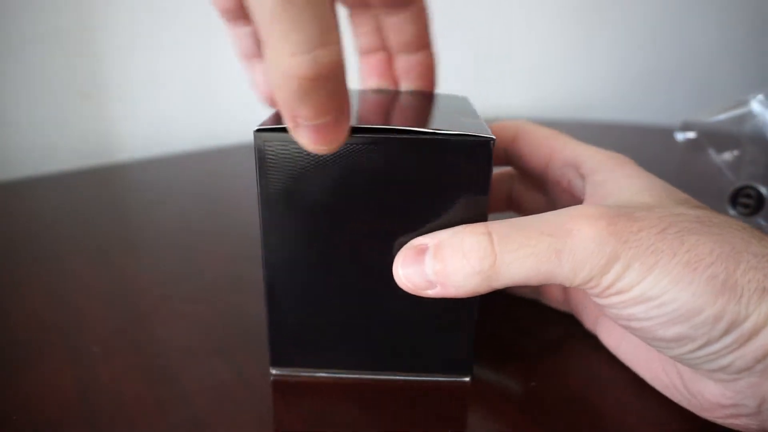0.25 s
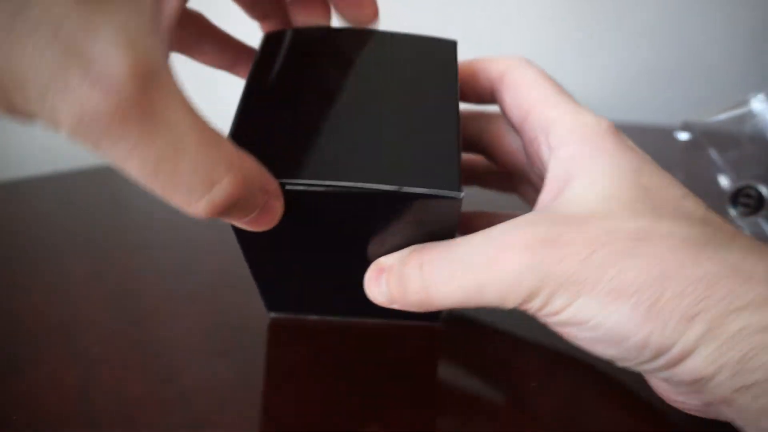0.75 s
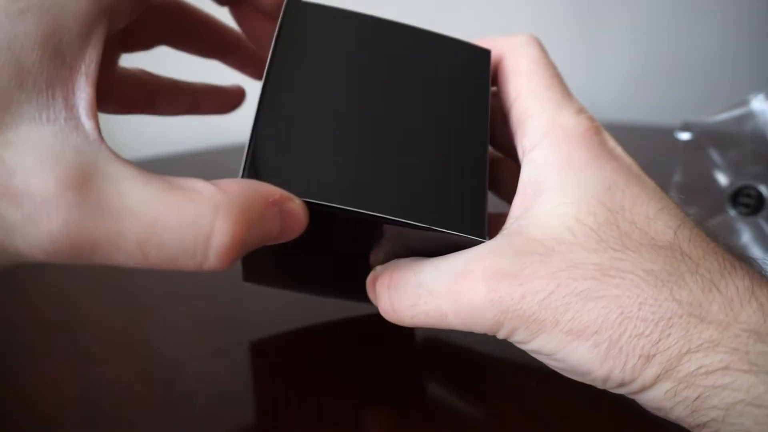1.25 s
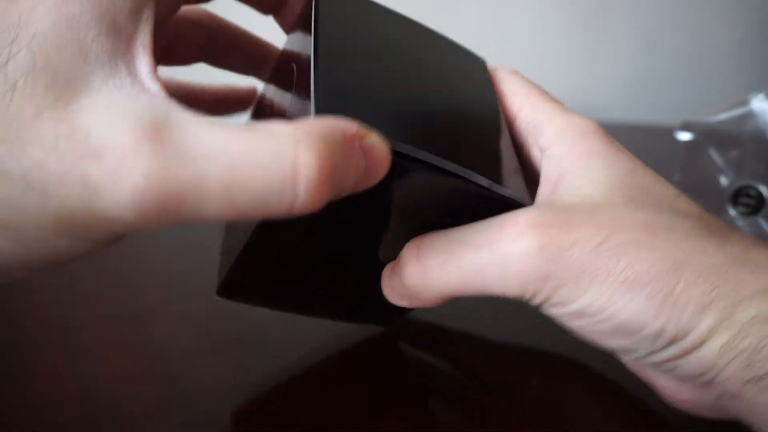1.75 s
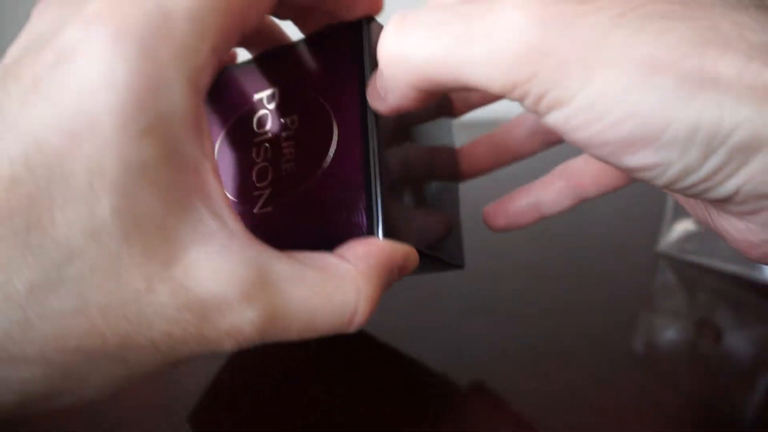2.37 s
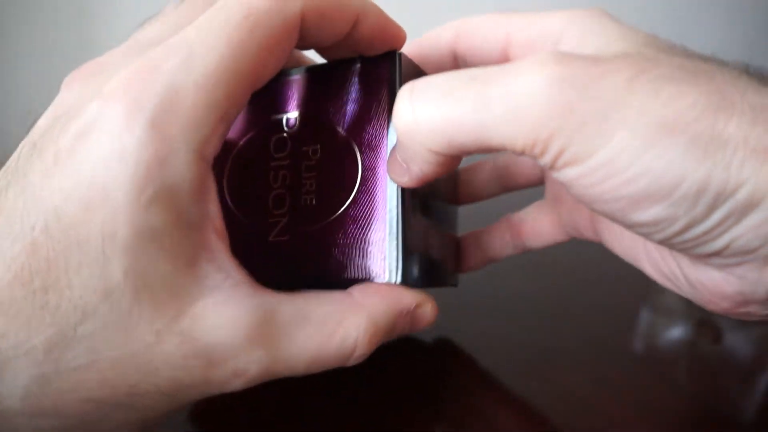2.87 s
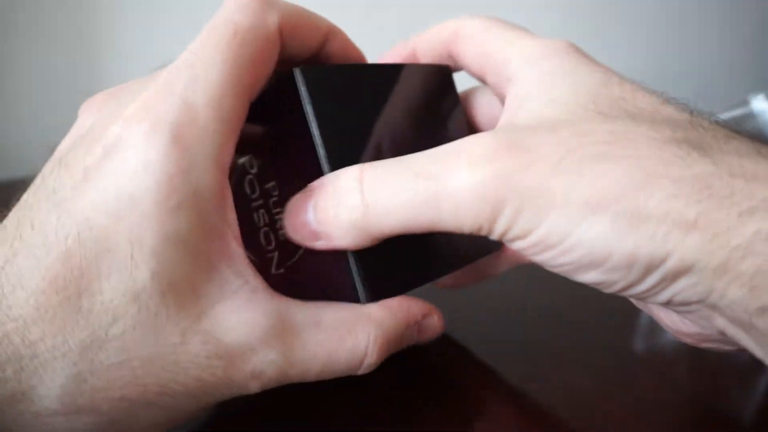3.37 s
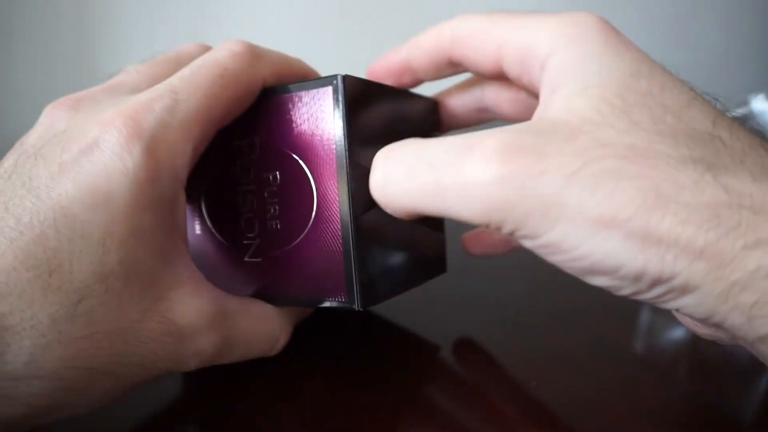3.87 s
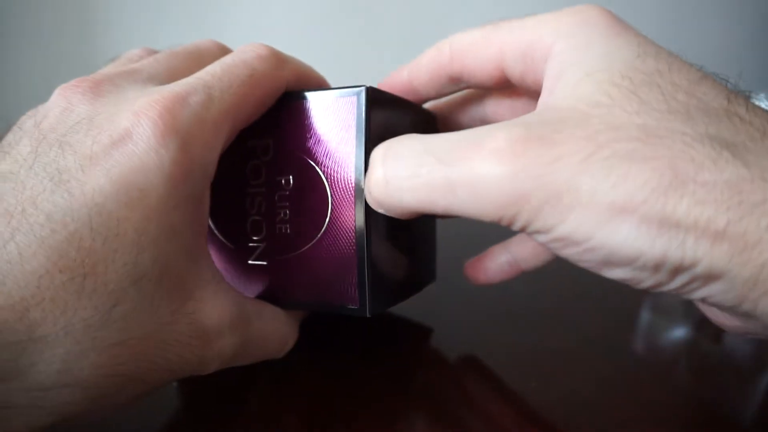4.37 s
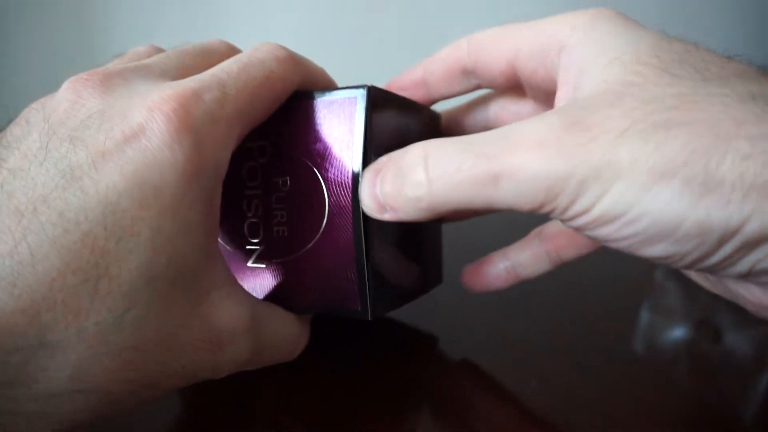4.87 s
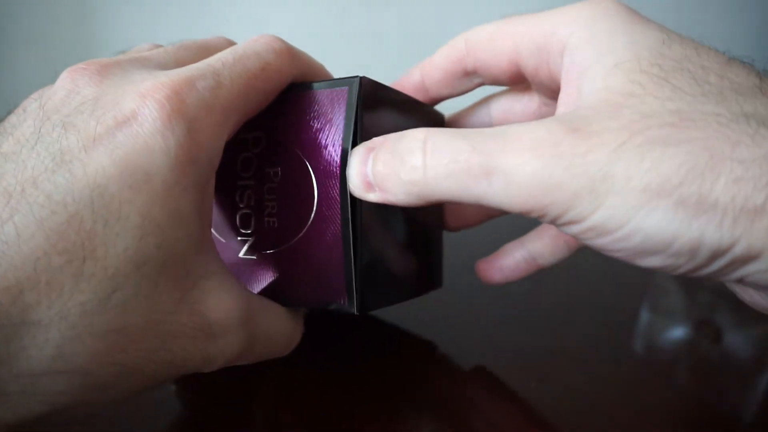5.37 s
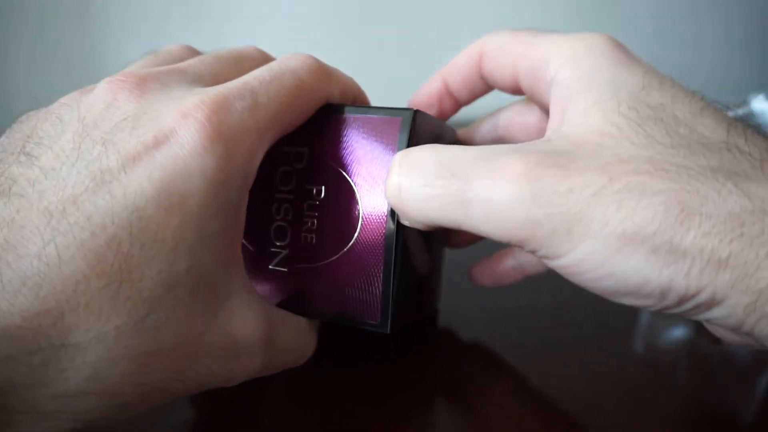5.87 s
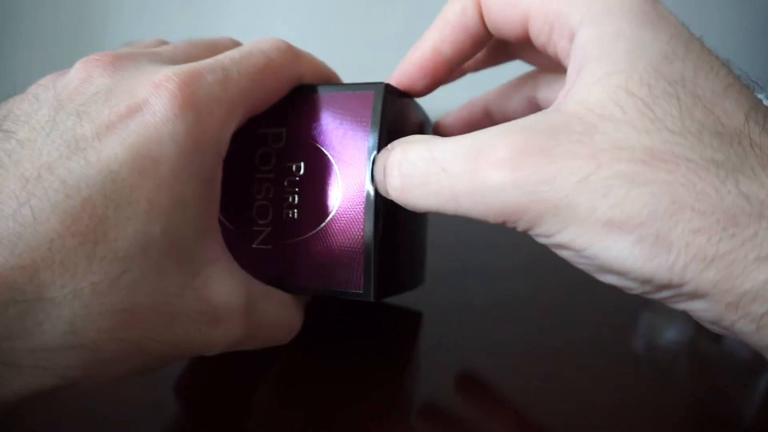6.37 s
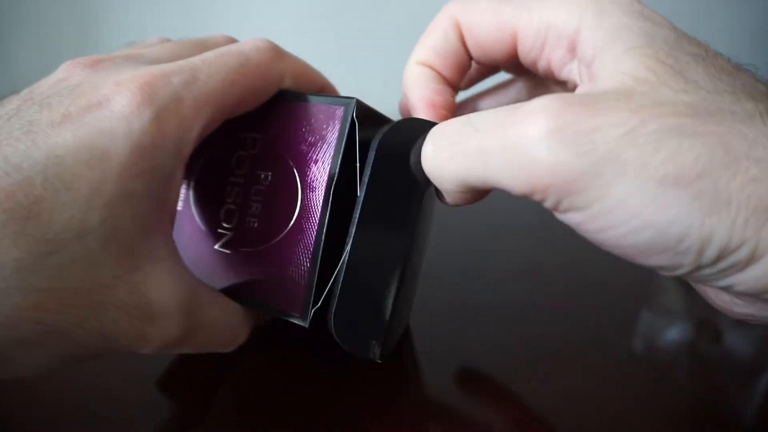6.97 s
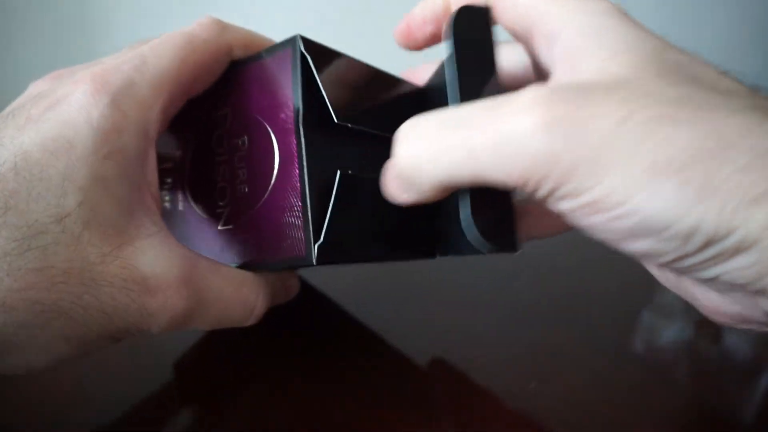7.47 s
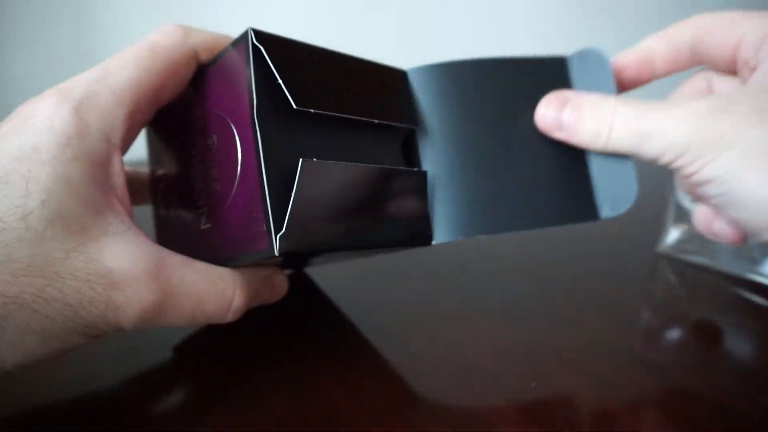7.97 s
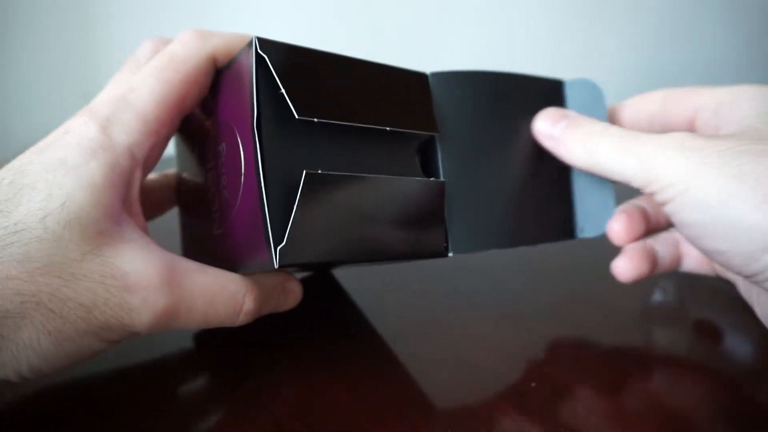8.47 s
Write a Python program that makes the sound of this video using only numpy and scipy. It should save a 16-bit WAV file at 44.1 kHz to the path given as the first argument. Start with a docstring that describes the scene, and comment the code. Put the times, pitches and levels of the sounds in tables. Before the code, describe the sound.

A small stiff carton is handled very near the microphone, dry but with short room reflections and soft background air. Light hollow taps and brief rubs come first, then a sharp knock against the table as the grip changes. A long stretch of gentle, sparse finger taps follows. Then come raspy scrapes, clicking edges, a tiny creak and a hinge pop as the lid opens, ending with bright card snaps and rubbing.

```python
"""A small, quiet room, just above a table top: hands turn a stiff cardboard box close to a camera's stereo microphone.
Fingertips pat and rub the hollow box, nails tick on its coating, card edges scrape and snap, and the lid is pulled open.
Pushes and runs of tiny slips ring damped modes of box and flaps; filtered slips and noise make the coating crackle.
Table and wall echoes, a diffuse tail, a brief low rumble and steady room noise surround the hands."""
import sys
import numpy as np
from scipy import signal
from scipy.fft import rfft, irfft, next_fast_len
from scipy.io import wavfile
from scipy.ndimage import uniform_filter1d, map_coordinates

SR = 44100
rng = np.random.default_rng(int(sys.argv[2]) if len(sys.argv) > 2 else 0)


def unload_wav(signal):
    """Save mono or channel-first audio to the path in sys.argv[1] as 16-bit WAV at rate SR, clipped to [-1, 1]."""
    wavfile.write(
        sys.argv[1],
        SR,
        np.round(np.clip(np.atleast_2d(signal).T, -1, 1) * 32767).astype(np.int16),
    )


N = 384552
TIME = np.arange(N) / SR


def undb(db):
    """Decibels to amplitude gain."""
    return 10 ** (np.asarray(db) / 20)


def unit(x):
    """Scale to rms 1."""
    return x / np.sqrt(np.mean(x ** 2) + 1e-20)


def at_peak(x, db):
    """Set the level of the loudest 4 ms."""
    power = uniform_filter1d(np.mean(x, axis=0) ** 2, SR // 250)
    return x * undb(db) / np.sqrt(power.max() + 1e-20)


def add(out, x, s):
    """Mix a stereo sound in at time s."""
    i = max(int(s * SR), 0)
    part = x[:, :max(N - i, 0)]
    out[:, i:i + part.shape[1]] += part


def colour(x, points):
    """Filter by a curve of (f/Hz, level/dB), interpolated over log frequency."""
    hz, db = np.transpose(points)
    size = next_fast_len(x.shape[-1])
    f = np.maximum(np.fft.rfftfreq(size, 1 / SR), 1)
    gain = undb(np.interp(np.log(f), np.log(hz), db))
    return irfft(rfft(x, size) * gain, size)[..., :x.shape[-1]]


# room noise, shape of its spectrum: [f/Hz, relative level/dB]
ROOM_NOISE = [(20, -42), (60, -32), (110, -14), (200, -11), (400, -5), (700, -4.5), (1200, -8),
              (2500, -13.5), (6000, -16.5), (11000, -14.5), (16000, -19)]
ROOM_NOISE_DB = -62  # rms of the part common to both sides


def air():
    """Steady noise of the room, narrower in the bass than in the treble."""
    mid, side = colour(rng.standard_normal((2, N)), ROOM_NOISE)
    side = colour(side, [(100, -8.0), (600, 2.5), (1500, 2.0), (8000, 1.0)])
    return undb(ROOM_NOISE_DB) * (mid + np.outer([1, -1], side)) / np.std(mid)


def rumble(centre_s=2.075, width_s=0.097, db=-53):
    """A brief low rumble as the box is swung round: filtered noise under a bell-shaped swell."""
    noise = colour(rng.standard_normal(N), [(20, -18), (60, -1), (150, 3.5), (240, -4.5), (500, -15), (3000, -70)])
    swell = np.exp(-((TIME - centre_s) / width_s) ** 2)
    return undb(db) * unit(noise) * swell


# reverberation of the small room: [f/Hz, relative level/dB, t60/s]
ROOM_TAIL = [(150, -2, 0.57), (400, -3.5, 0.29), (900, -0.5, 0.29), (1800, 0, 0.27), (5330, -3.5, 0.26),
             (9400, -5, 0.24), (14800, -8, 0.16)]


def room(dry, wet_db=-3, build_s=0.00076, table_db=-11, table_s=.0029, wall_db=-16, wall_s=0.014):
    """Echoes from the table top and the near wall, and a diffuse tail whose bass is alike on both sides."""
    t = np.arange(SR * 2 // 3) / SR
    hz, db, t60 = np.transpose(ROOM_TAIL)
    f = np.maximum(np.fft.rfftfreq(len(t), 1 / SR), 1)
    mid, side = rfft(rng.standard_normal((2, len(t))))
    width = np.minimum(f / 1700, 1)
    noise = (mid + np.outer([1, -1], width * side)) / np.sqrt(1 + width ** 2)
    response = np.zeros((2, len(t)))
    # each row of the identity picks one band, which overlaps its neighbours
    for share, band_db, band_t60 in zip(np.eye(len(hz)), db, t60):
        decay = 1000 ** (-t / band_t60) * (1 - np.exp(-t / build_s))
        band = irfft(noise * np.interp(np.log(f), np.log(hz), share), len(t))
        response += undb(band_db + wet_db) * band * decay / np.linalg.norm(decay)
    response[:, 0] += 1  # direct sound
    # both echoes reach the two sides at slightly different moments
    response[[0, 1], [int(table_s * SR), int(table_s * SR) + 3]] += undb(table_db)
    response[[0, 1], [int(wall_s * SR), int(wall_s * 1.02 * SR)]] += undb(wall_db)
    return signal.fftconvolve(dry, response, axes=1)[:, :N]


def ring(force, modes, main_hz=None, main_db=7, main_sustain=1.32, detune=0.035, apart=.1,
         thud=0.38, thud_share=0.44, sustain=1):
    """Drive damped modes. The grip bends the panels: one mode may lead at main_hz, the others stray in pitch."""
    hz, db, t60 = np.transpose(modes)
    t = np.arange(SR // 16) / SR
    nearest = np.argmin(np.abs(hz - main_hz)) if main_hz else -1
    lead = np.arange(len(hz)) == nearest
    strayed_hz = hz * (1 + detune * rng.standard_normal(len(hz)))
    hz = np.where(lead, main_hz or 0, strayed_hz)
    t60 = t60 * np.where(lead, main_sustain, 1) * max(sustain, .1)
    decay = 1000 ** (-t / t60[:, None])
    # card loses its first, widest swings fastest, which broadens every resonance
    fast_decay = decay ** (1 / max(thud_share, .05))
    waves = np.sin(2 * np.pi * hz[:, None] * t) * (decay + thud * fast_decay)
    # the weaker modes beam unevenly to the two sides
    lean = rng.choice([-1, 1], len(hz)) * np.where(lead, .25, 1)
    sides = 1 + apart * np.outer([1, -1], lean)
    gains = undb(db + main_db * lead) * (-1) ** np.arange(len(hz)) * sides
    return signal.fftconvolve(force[None], gains @ waves, axes=1)[:, :len(force)]


def grains(size, rate, spread_db):
    """Tiny slips of uneven strength and random sign at random moments, rate per second."""
    chance = rng.random(size) < rate / SR
    strength = undb(spread_db * np.minimum(rng.exponential(size=size), 4))
    return chance * strength * rng.choice([-1, 1], size)


# crackle of the coated surface before tilt: [f/Hz, relative level/dB]
COATING = [(1200, -72), (2600, -1), (4000, 2.5), (5200, 3), (6400, 0.5), (7800, 1.5), (10000, 2.5),
           (12500, 3.5), (15500, -3), (17000, 3)]


def crackle(force, envelope, tilt=0, scatter=0.76, pivot_hz=8000, peaky_db=0):
    """The coating radiates each slip directly and scatters noise differently to each side."""
    diffuse = unit(rng.standard_normal((2, len(force))) * envelope)
    points_hz, points_db = np.transpose(COATING)
    hz = np.geomspace(1200, 17000, 36)
    db = np.interp(np.log(hz), np.log(points_hz), points_db)
    # the tilt, in dB per octave, stops one octave either side of the pivot
    db = db + tilt * np.clip(np.log2(hz / pivot_hz), -1, 1)
    # each spot on the card favours its own high resonances
    db = db + peaky_db * rng.uniform(-1.0, 1, len(hz))
    return colour(unit(force) + scatter * diffuse, np.column_stack([hz, db]))


# the box bumping the table as it is gripped anew: [t/s, peak level/dB before radiation and room]
TABLE_BUMPS = [(2.937, -54), (2.998, -26), (3.036, -28.5), (3.234, -38.5), (3.607, -41)]
# the table top under it, before slight detuning: [f/Hz, relative level/dB, t60/s]
TABLE_TOP = [(42, 5, 0.088), (129, -0.5, 0.064), (220, -2, 0.071), (424, 8, 0.056)]


def bumps(contact_s=0.0018):
    """The box passes a dull push to the table top, whose low modes ring."""
    out = np.zeros((2, N))
    push = np.exp(-np.arange(SR // 10) / SR / max(contact_s, 1e-4))
    for s, db in TABLE_BUMPS:
        thump = ring(np.diff(push, prepend=0), TABLE_TOP, apart=0.042)
        add(out, at_peak(thump, db), s)
    return out


# the grip shifting on the box, before trims and filters: [t/s, box level/dB, flap level/dB, skin hiss level/dB]
GRIP_LEVELS = [(0.0, -32, -62, -54.5), (0.14, -64, -56.5, -55), (0.44, -55, -68, -52.5),
               (0.73, -59.5, -74, -48.5), (1.14, -67, -70, -58.5), (1.85, -55.5, -65.5, -58),
               (2.06, -57, -64, -47.5), (2.5, -62.5, -69, -60), (2.69, -67, -68, -64),
               (2.86, -53.5, -64, -56), (3.08, -48, -59.5, -50), (3.89, -60.5, -68, -58),
               (4.27, -76, -75, -67), (5.05, -61, -76, -59.5), (5.56, -69.5, -76, -66),
               (6.19, -66, -84, -60.5), (6.53, -67, -63, -67), (6.66, -51.5, -54, -54),
               (6.771, -53, -59.5, -53), (7.14, -58, -67, -58), (7.45, -52.5, -66, -50.5),
               (7.8, -63.5, -67.5, -57), (8.11, -72, -71, -56.5), (8.26, -49.5, -58.5, -53),
               (8.55, -53, -61.5, -50), (8.72, -41.5, -56, -50)]
# air and walls of the box, before grip and damping: [f/Hz, relative level/dB, t60/s]
BOX = [(126.5, -23, 0.14), (256, -10, 0.051), (290.6, -7, 0.044), (408.6, -5, 0.059), (527.3, -3.5, 0.054),
       (576, -5, 0.062), (680, 0, 0.027), (800, -1, 0.044), (880, -0.5, 0.035), (950, 0.5, 0.0071)]
# bending of the flaps, before grip and damping: [f/Hz, relative level/dB, t60/s]
FLAPS = [(1275, -9, 0.026), (1505, -4.5, 0.024), (1740, 2, 0.0089), (1988, 0, 0.013), (2400, -4, 0.016),
         (2817, -3.5, 0.016), (3140, 1, 0.0068), (3570, -3.5, 0.0092), (5380, -11.5, 0.0063),
         (6530, -10, 0.015)]
# a soft fingertip shakes the box without any thump: [f/Hz, level/dB]
SOFT_TOUCH = [(30, -26), (80, -32), (160, -2.5), (300, -2), (650, -3), (1000, -2.5), (1600, 2),
              (16000, -5.5)]
CREEP_RATE, SCRATCH_RATE = 170, 900  # slips on a wall and scratches on a flap, per second


def grip(box_db=-3, hiss_db=-6, unrest_db=3):
    """Fingertips creep on the card in fits and starts; every new hold retunes the panels a little."""
    s, *columns = np.transpose(GRIP_LEVELS)
    box, flap, hiss = (undb(np.interp(TIME, s, c)) for c in columns)
    size = SR // 6
    half = size // 2
    hold = np.pad(np.sqrt(np.hanning(size)), (0, half))
    out = np.zeros((2, N))
    for i in range(0, N, half):  # holds overlap by half
        middle = min(i + half, N - 1)
        creep = hold * grains(len(hold), rate=CREEP_RATE, spread_db=2.5)
        scratch = hold * grains(len(hold), rate=SCRATCH_RATE, spread_db=2.0)
        box_ring = unit(ring(creep, BOX, detune=0.065, apart=0.24, sustain=0.84))
        flap_ring = unit(ring(scratch, FLAPS, detune=0.092, apart=0.34, sustain=0.44))
        sound = undb(box_db) * box[middle] * box_ring + flap[middle] * flap_ring
        add(out, sound * undb(unrest_db * rng.uniform(-1.17, 0)), i / SR)
    skin = grains(N, rate=2500, spread_db=2.5)
    return colour(out, SOFT_TOUCH) + undb(hiss_db) * hiss * unit(crackle(skin, 1, scatter=1.0))


FLEX_SHARE = .055  # rms wander of the playback rate, before its slow drift is removed


def flex(x):
    """A flap bends as it is worked, so its resonances slide up and down within milliseconds."""
    size = x.shape[1]
    bend = unit(uniform_filter1d(rng.standard_normal(size), size=160))
    slide = np.cumsum(bend - uniform_filter1d(bend, size=1500))
    read_at = np.arange(size) + FLEX_SHARE * slide
    return np.array([map_coordinates(side, [read_at]) for side in x])


SPOT_DB = 4.5  # most that a high resonance at one spot on the card rises or falls


def stroke(length_s, box_db, flap_db, hiss_db, box_hz, flap_hz, tilt, ring_db, edge, judder_db, grain_db,
           rise_db=0, snag_db=14, sustain=0.64):
    """A stroke is a dense run of slips under wavering pressure; the coarser ones shake the box."""
    size = max(int(length_s * SR), SR // 200)
    pressure = signal.windows.tukey(size, edge) * undb(rise_db * np.linspace(0, 1, size))
    pressure = np.pad(pressure, (0, SR // 20))  # room for the ring to die away
    pressure *= undb(judder_db * unit(uniform_filter1d(rng.standard_normal(len(pressure)), size=300)))
    coarse = pressure * grains(len(pressure), rate=900, spread_db=2.0)
    fine = pressure * grains(len(pressure), rate=7600, spread_db=grain_db)
    # now and then a single fibre snags and plucks the flap
    snags = undb(snag_db) * pressure * grains(len(pressure), rate=230, spread_db=2.0)
    box = ring(coarse, BOX, box_hz, main_db=ring_db, detune=0.045, apart=0.038, sustain=sustain)
    flap = ring(fine + snags, FLAPS, flap_hz, main_db=ring_db, detune=0.046, apart=0.34, sustain=sustain)
    hiss = crackle(fine, pressure, tilt, scatter=1.0, peaky_db=SPOT_DB)
    sound = undb(box_db) * unit(box)
    sound += undb(flap_db) * unit(flex(flap))
    sound += undb(hiss_db) * unit(hiss)
    # the levels count over the stroke itself, without its padding
    return sound * np.sqrt(size / len(pressure))


# skin sliding over a wall, levels before radiation and room: [start t/s, end t/s, box level/dB, flap level/dB,
# hiss level/dB, ring of that wall f/Hz, main flap ring f/Hz, hiss tilt/dB per octave]
SKIN_RUBS = [(0.058, 0.121, -46, -45, -39.5, 1000, 1700, 1),
             (0.11, 0.27, -54.5, -57.5, -43, 690, 2360, 1.5),
             (0.409, 0.613, -62, -55, -57.5, 880, 2660, -1.5),
             (0.604, 0.85, -57.5, -55, -58, 448, 2790, -2), (0.66, 0.714, -60, -59, -49.5, 400, 2980, -2),
             (0.901, 0.944, -61, -59, -51, 670, 1700, -0.5),
             (1.032, 1.094, -53, -55.5, -50.5, 540, 1720, 1),
             (1.851, 1.964, -58, -57.5, -43.5, 400, 1500, 4.5), (2.104, 2.177, -54, -56, -67, 400, 1690, 3),
             (2.17, 2.275, -56, -59.5, -67, 734, 1680, -6),
             (2.559, 2.589, -48.5, -52.5, -52.5, 680, 1660, 2),
             (2.747, 2.775, -55, -51.5, -56, 710, 2100, 3), (3.399, 3.428, -47, -50, -39.5, 644, 3300, 2.5),
             (3.618, 3.645, -49, -48, -45.5, 387, 1670, 3), (4.55, 4.623, -58.5, -72, -83, 618, 1700, 2),
             (4.814, 4.891, -50, -59, -61, 424, 1626, 6), (5.704, 5.74, -70, -73, -61, 704, 2700, 1),
             (5.889, 5.965, -58, -81, -85, 377, 1700, -8), (6.22, 6.348, -66.5, -76, -85, 680, 1700, 2),
             (8.502, 8.579, -49, -46, -41, 950, 1620, 0)]
RUB_GRIT_DB = 5  # how unequal the fine slips are


def rubs(ring_db=3.0, edge=0.22, judder_db=-1.0):
    """Skin drags on a wall, stirs the flaps and hisses on the coating."""
    out = np.zeros((2, N))
    for start, end, box, flap, hiss, box_hz, flap_hz, tilt in SKIN_RUBS:
        sound = stroke(end - start, box, flap, hiss, box_hz, flap_hz, tilt, ring_db, edge, judder_db, RUB_GRIT_DB)
        add(out, sound, start)
    return out


# skin sticking and slipping in step: [start t/s, length/s, settled pitch f/Hz, level/dB before its swell]
SKIN_SQUEAKS = [(3.145, 0.029, 1500, -39), (4.828, 0.045, 425, -37.5)]


def squeaks(waver=0.021, sharp=0.89, settle_s=0.0029):
    """For a moment the slips lock to one panel mode: a short, unsteady note that starts sharp and settles."""
    out = np.zeros((2, N))
    for start, length, hz, db in SKIN_SQUEAKS:
        size = max(int(length * SR), SR // 200)
        drift = unit(uniform_filter1d(rng.standard_normal(size), size=120))
        onset = sharp * np.exp(-np.arange(size) / SR / max(settle_s, 1e-4))
        pitch_hz = hz * (1 + onset + waver * drift)
        note = unit(np.sin(2 * np.pi * np.cumsum(pitch_hz) / SR))
        add(out, np.tile(undb(db) * np.hanning(size) * note, (2, 1)), start)
    return out


CATCH_S = .005  # time for an edge to catch before it lets go
FLAP_SUSTAIN = 1.15  # how much longer the leading flap mode lasts than its tabled time


def strike(box_db, flap_db, crackle_db, box_hz, flap_hz, ring_db, tilt, contact_s, lead_s, sustain, fibres=1.0):
    """An edge catches and lets go with one sharp push, while its fibres crunch around the contact."""
    t = (np.arange(SR // 16) - int(CATCH_S * SR)) / SR
    envelope = np.exp(-np.abs(t) / np.maximum(np.where(t < 0, lead_s, contact_s), 1e-4))
    crunch = grains(len(t), rate=9000, spread_db=6.0) * envelope
    force = fibres * crunch / np.linalg.norm(crunch)
    release = t == 0
    push = force + release
    box = ring(push, BOX, box_hz, main_db=ring_db, detune=0.055, apart=0.022, sustain=sustain)
    flap = ring(push, FLAPS, flap_hz, main_db=ring_db, main_sustain=FLAP_SUSTAIN,
                detune=0.079, apart=0.47, sustain=sustain)
    coating = crackle(force + 0.28 * release, envelope, tilt, scatter=0.99, peaky_db=SPOT_DB)
    return at_peak(box, box_db) + at_peak(flap, flap_db) + at_peak(coating, crackle_db)


# fingertips landing on a wall, peak levels before radiation and room:
# [t/s, box level/dB, crackle level/dB, ring of that wall f/Hz, contact time/s]
FINGER_PATS = [(0.04, -44, -61, 590, 0.00088), (0.152, -41.5, -52, 715, 0.0023),
               (0.173, -45, -46, 520, 0.0037), (0.364, -50, -78, 435, 0.0014),
               (0.48, -43, -47, 880, 0.0041), (0.55, -47, -56, 950, 0.0022), (0.568, -49, -52, 880, 0.0039),
               (0.614, -51, -49, 960, 0.0013), (0.654, -37.5, -47, 400, 0.005),
               (0.703, -48, -55, 695, 0.0031), (0.753, -41, -45, 674, .003), (0.8, -48, -47, 830, 0.0024),
               (0.831, -38.5, -47, 790, 0.004), (0.858, -33.5, -42, 765, 0.0015),
               (1.008, -52, -70, 700, .002), (1.076, -42, -58, 640, 0.0045), (1.176, -50, -76, 700, 0.0012),
               (1.321, -44, -66, 630, 0.0048), (1.679, -46, -82, 630, 0.0029),
               (2.215, -44.5, -56, 770, 0.0033), (2.674, -42.5, -54, 800, 0.0033),
               (2.689, -43, -63, 680, 0.0056), (2.782, -40, -55, 646, 0.00074),
               (2.853, -38.5, -54.5, 731, 0.0065), (2.908, -39, -58, 680, 0.0072),
               (2.946, -38, -50, 704, .003), (2.955, -48, -37, 670, .003), (2.966, -37, -54, 784, .003),
               (2.979, -29, -42, 960, 0.0022), (3.188, -41.5, -52, 385, 0.0045),
               (3.29, -43, -55, 630, 0.0044), (3.444, -37.5, -49.5, 880, .003),
               (3.55, -36, -42, 880, 0.0018), (3.56, -37, -63, 880, 0.0024), (3.589, -46, -58, 690, .0015),
               (3.608, -33, -51, 730, 0.00088), (3.631, -39.5, -45, 400, 0.0028),
               (3.777, -46.5, -61, 840, 0.0023), (3.843, -41, -65, 900, 0.0013),
               (3.939, -38, -49, 680, 0.0088), (4.26, -39.5, -58, 802, 0.0071),
               (4.446, -55, -79, 680, 0.00086), (4.48, -48.5, -64, 680, 0.0011),
               (4.515, -49, -65, 680, 0.0021), (4.551, -53, -72, 577, 0.0014),
               (4.588, -49.5, -78, 580, 0.00088), (4.76, -50, -85, 646, 0.0013),
               (4.771, -52, -80, 674, 0.002), (4.82, -45.5, -51.5, 680, 0.0082),
               (5.006, -48.5, -75, 400, 0.0018), (5.032, -47.5, -74, 412, 0.0032),
               (5.061, -48, -57, 670, .004), (5.156, -43.5, -63, 629, 0.00083),
               (5.208, -46.5, -79, 650, 0.0016), (5.27, -43, -70, 626, 0.0039),
               (5.298, -44.5, -81, 602, 0.00075), (5.339, -43.5, -82, 670, 0.0019),
               (5.537, -53.5, -61, 680, 0.0022), (5.734, -47, -55, 660, 0.0024),
               (5.761, -49, -74, 423, .002), (5.827, -49.5, -68, 380, 0.0049), (5.848, -50, -73, 374, .001),
               (5.936, -52.5, -80, 590, 0.00078), (6.144, -51.5, -55, 680, 0.0018),
               (6.16, -48, -62, 720, 0.0026), (6.332, -53.5, -76, 680, .002), (6.448, -52, -80, 650, .002),
               (6.485, -39.5, -54, 800, .004), (7.106, -32.5, -55, 860, 0.003),
               (7.262, -40.5, -51, 629, 0.0049), (7.413, -38, -38.5, 456, 0.0037),
               (7.579, -40.5, -67, 624.5, 0.0026), (8.274, -40, -56, 739, 0.0048),
               (8.313, -42.5, -51, 810, 0.0044), (8.48, -37.5, -43, 1030, 0.004),
               (8.657, -37, -62, 739, 0.0073), (8.669, -38.5, -64, 704, 0.0055)]


def pats(flap_db=-4, flap_hz=1500, tilt=-0.51, lead_s=0.001, ring_db=6.0, sustain=0.61):
    """A short contact sounds the hollow box and the coating at its row's levels; the flaps follow their mean."""
    out = np.zeros((2, N))
    for s, box, crack, box_hz, contact_s in FINGER_PATS:
        flap = (box + crack) / 2 + flap_db
        sound = strike(box, flap, crack, box_hz, flap_hz, ring_db, tilt, contact_s, lead_s, sustain)
        add(out, sound, s - CATCH_S)
    return out


# each new hold leaves another wall free to ring: [from t/s, main box ring f/Hz]
FREE_WALLS = [(0, 741.2), (2.6, 892), (3.6, 731), (6.89, 900), (8.0, 1020)]


def free_wall_hz(s):
    """The note of the wall that the hands leave free at time s."""
    starts, hz = np.transpose(FREE_WALLS)
    return hz[np.sum(starts[1:] <= s)]


# nails and creases ticking in the coating: [t/s, peak crackle level/dB before radiation and room]
NAIL_TICKS = [(0.065, -39), (2.364, -51), (2.409, -50.5), (2.459, -48.5), (2.534, -45.5), (3.378, -36.5),
              (3.623, -53), (4.516, -44.5), (5.518, -50), (6.704, -45), (7.008, -44.5), (7.589, -41),
              (7.856, -49.5), (8.643, -38)]


def ticks(box_db=-52, flap_db=-11, flap_hz=2700, tilt=5, contact_s=0.0019, lead_s=0.0011, ring_db=3, sustain=0.55):
    """A tiny hard contact gives a bright click and barely stirs the box."""
    out = np.zeros((2, N))
    for s, db in NAIL_TICKS:
        sound = strike(box_db, db + flap_db, db, free_wall_hz(s), flap_hz, ring_db, tilt, contact_s, lead_s, sustain)
        add(out, sound, s - CATCH_S)
    return out


# card sliding on card, levels before radiation and room: [start t/s, end t/s, box level/dB, flap level/dB,
# hiss level/dB, main flap ring f/Hz, rise in pressure over the stroke/dB, how far the main rings stand out/dB]
CARD_SCRAPES = [(0.747, 0.757, -43, -50, -43, 2560, -7, 3.5), (0.85, 0.855, -39, -36.5, -42.5, 2560, 2, -3),
                (1.332, 1.426, -58.5, -63, -60.5, 2900, 8, 11), (1.427, 1.438, -45, -44, -53, 2870, 9, 6),
                (1.443, 1.468, -36, -34, -35.5, 2620, 9, 8), (2.924, 2.996, -41, -44.5, -39, 2600, -20, 9),
                (2.998, 3.057, -47, -46, -45, 1820, -2, 2),
                (3.218, 3.274, -45.5, -43.5, -46.5, 1740, -9, 3.5),
                (4.252, 4.275, -48, -54, -71, 2190, -5, 4.5), (6.466, 6.48, -50, -55, -56, 3140, 0, 6),
                (6.6, 6.629, -32.5, -38.5, -40, 2610, -12, 6), (6.764, 6.779, -43, -45.5, -43, 1300, 4, 12),
                (6.813, 6.833, -38, -40.5, -35, 2400, 13, 8),
                (6.862, 6.916, -36, -36, -38.5, 2450, 18, 3.5),
                (6.925, 7.021, -50.5, -47.5, -55, 2204, -4, 4),
                (7.093, 7.104, -37.5, -44.5, -42.5, 2330, 9, 6),
                (7.28, 7.385, -77, -56, -52.5, 2400, 10, 13), (7.656, 7.671, -51, -47.5, -45.5, 3750, 6, 6),
                (7.975, 8.013, -67, -56.5, -59, 2230, 9, 3), (8.335, 8.377, -70, -50, -46, 2900, -1, 5),
                (8.372, 8.398, -40.5, -33.5, -33, 2600, 4.5, -1),
                (8.436, 8.525, -48, -46, -46.5, 2440, 4, 4), (8.635, 8.654, -45, -44, -42, 5350, 8, 16)]
SCRAPE_JUDDER_DB, SCRAPE_GRIT_DB = 1.8, 5.5  # unevenness of the pressure and of the fine slips


def scrapes(tilt=-0.3, edge=0.13):
    """A dry edge drags along a flap, which rasps while its coating hisses."""
    out = np.zeros((2, N))
    for start, end, box, flap, hiss, flap_hz, rise_db, ring_db in CARD_SCRAPES:
        sound = stroke(end - start, box, flap, hiss, free_wall_hz(start), flap_hz,
                       tilt, ring_db, edge, SCRAPE_JUDDER_DB, SCRAPE_GRIT_DB, rise_db)
        add(out, sound, start)
    return out


# card edges catching and letting go, peak levels before radiation and room: [t/s, box level/dB, flap level/dB,
# crackle level/dB, main flap ring f/Hz, contact time/s, crackle tilt/dB per octave,
# share of the ring time that the fingers leave]
EDGE_SNAPS = [(1.444, -37, -36.5, -58, 2990, 0.0011, 0, 0.46),
              (1.455, -47, -39, -46, 2450, 0.0028, 3, 0.45),
              (1.466, -34.5, -36.5, -46, 3140, 0.0013, 3, 0.5),
              (1.486, -43, -37, -53, 3000, 0.0013, 0, 0.45),
              (2.714, -31, -35, -35, 1870, 0.0015, 4.5, 0.41),
              (2.933, -17, -30, -29, 2810, 0.0022, 2, 0.67),
              (2.999, -30.5, -27, -41, 1624, 0.0012, 1, 0.52),
              (3.008, -31, -37, -48, 1590, 0.0013, -5, 0.62),
              (3.022, -28.5, -36, -43, 1470, 0.0015, -3, 0.4),
              (3.035, -36, -30, -35.5, 1660, 0.00077, -3, 0.38),
              (3.039, -38, -33.5, -48, 1730, 0.0026, -11, 0.62),
              (3.229, -51, -31, -28.5, 3640, .002, 6.5, 0.88),
              (5.686, -52, -39.5, -27, 2650, 0.0013, 4.5, 0.17),
              (6.475, -41, -40.5, -43.5, 2950, 0.0066, -3, 0.63),
              (6.531, -34.5, -26.5, -34, 1900, 0.002, -2.5, 0.59),
              (6.609, -21.5, -34.5, -25.5, 2100, 0.00094, 1, 0.57),
              (6.825, -23, -28, -25, 2596, 0.0034, 4, 0.63),
              (6.882, -28, -31.5, -30, 2635, 0.0046, 5, 0.55), (6.896, -28, -30, -30, 2360, 0.0011, 1, 0.5),
              (6.91, -34, -37, -26.5, 2410, .002, -1, 0.58),
              (8.105, -33.5, -28, -43, 2400, 0.0029, -1, 0.66),
              (8.132, -32.5, -30, -33, 1510, 0.0049, 5, 0.36),
              (8.389, -33, -23.5, -37, 1470, 0.0043, 2, 0.73),
              (8.429, -27.5, -20.5, -26, 2820, 0.0012, -5, 0.65),
              (8.436, -24, -23, -27.5, 1470, 0.0035, 0, 1), (8.447, -32, -44, -47, 2400, 0.0016, -2, 0.81),
              (8.46, -43, -50, -46, 1510, 0.0018, -2, 0.57)]


def snaps(lead_s=0.001, ring_db=6.5):
    """A bent edge slips free and sets box, flap and coating going at once; the fingers damp them."""
    out = np.zeros((2, N))
    for s, box, flap, crack, flap_hz, contact_s, tilt, sustain in EDGE_SNAPS:
        sound = strike(box, flap, crack, free_wall_hz(s), flap_hz, ring_db, tilt, contact_s, lead_s, sustain)
        add(out, sound, s - CATCH_S)
    return out


# start (s), length of the swell (s), peak level (dB), leading flap ring (Hz)
CREAK_S, CREAK_LENGTH_S, CREAK_DB, CREAK_HZ = 7.1315, 0.0184, -37.5, 2100
CREAK_SLIPS_PER_S = 440  # before jitter


def creak(jitter=.14, ring_db=11, sustain=0.29):
    """The crease of the lid sticks and slips in quick succession, each slip a dead knock on the flap."""
    count = 12
    slips_s = np.cumsum(np.exp(jitter * rng.standard_normal(count))) / CREAK_SLIPS_PER_S
    force, out = np.zeros(SR // 10), np.zeros((2, N))
    # slips later than the swell have no strength
    force[(slips_s * SR).astype(int)] = np.sin(np.pi * np.minimum(slips_s / CREAK_LENGTH_S, 1))
    knocks = ring(force, FLAPS, CREAK_HZ, main_db=ring_db, sustain=sustain)
    add(out, at_peak(knocks, CREAK_DB), CREAK_S)
    return out


# what the buckling fold rings with: [multiple of the pitch, relative level/dB]
FOLD_PARTIALS = [(1, -1.5), (1.6, -16), (2.7, -18)]
# start (s), peak level (dB), first and last pitch (Hz)
POP_S, POP_DB, POP_FROM_HZ, POP_TO_HZ = 7.41, -20.5, 2730, 2010
POP_GIVE_S, POP_STOP_S = .0032, .0007  # time to give way, and decay time as it falls still


def hinge_pop(crackle_db=-13):
    """The lid's hinge buckles: its fold swells as it gives way, drops in pitch as it slackens and soon falls still."""
    out = np.zeros((2, N))
    t = np.arange(SR // 40) / SR
    swell = np.minimum(t / POP_GIVE_S, 1) * np.exp(-np.maximum(t - POP_GIVE_S, 0) / POP_STOP_S)
    pitch_hz = np.interp(t, [0, POP_GIVE_S + 2 * POP_STOP_S], [POP_FROM_HZ, POP_TO_HZ])
    phase = 2 * np.pi * np.cumsum(pitch_hz) / SR
    knock = swell * sum(undb(db) * np.sin(k * phase) for k, db in FOLD_PARTIALS)
    fibres = crackle(swell * grains(len(t), rate=13000, spread_db=4), swell)
    add(out, at_peak(unit(knock) + undb(crackle_db) * unit(fibres), POP_DB), POP_S)
    return out


# the thinner sound of the box once it traps less air: [f/Hz, level/dB]
THIN_COLOUR = [(60, -3.5), (160, -1), (320, -2.5), (650, -3), (950, 0.5), (1500, -0.5), (2600, 0.5),
               (3900, 0), (6300, 3.5), (10000, 1), (16000, 2)]
THINS_S, THINNING_S = 6.4, 0.43  # when the box starts to sound thinner, and how long that change takes


def thinning(box):
    """The whole box fades from its full colour to a thinner one, with less bass and more treble."""
    thinned = np.clip((TIME - THINS_S) / THINNING_S, 0, 1)
    return (1 - thinned) * box + thinned * colour(box, THIN_COLOUR)


# small panels radiate little bass: [f/Hz, level/dB]
PANEL_RADIATION = [(20, -20), (60, -20.5), (120, -8.5), (250, -0.5), (16000, 2)]
# where the hands work: [t/s, right minus left level/dB]
HANDS_PLACE = [(0, -0.3), (1.8, 0), (2.8, -0.5), (5.2, -0.5), (6.7, 0), (7.5, 0), (8.4, 1.5)]


def scene(lag_s=1.3e-5):
    """The hands work near the middle and end to the right; the left side hears them a moment early."""
    skin = pats() + rubs() + squeaks() + grip()
    card = snaps() + hinge_pop() + ticks() + scrapes() + creak()
    left, right = colour(thinning(skin + card) + bumps(), PANEL_RADIATION)
    # delay the right side by a fraction of a sample
    size = next_fast_len(N)
    lag = np.exp(-2j * np.pi * np.fft.rfftfreq(size, 1 / SR) * lag_s)
    right = irfft(rfft(right, size) * lag, size)[:N]
    pan = undb(np.interp(TIME, *np.transpose(HANDS_PLACE)) / 2)
    return room(np.array([left / pan, right * pan])) + rumble() + air()


TOP_HZ = 15900


def record(dry):
    """The camera cuts the top of the treble with a steep low-pass."""
    return signal.sosfilt(signal.ellip(8, .2, 70, TOP_HZ, fs=SR, output="sos"), dry)


dry = scene()
out = record(dry)
unload_wav(out)
```